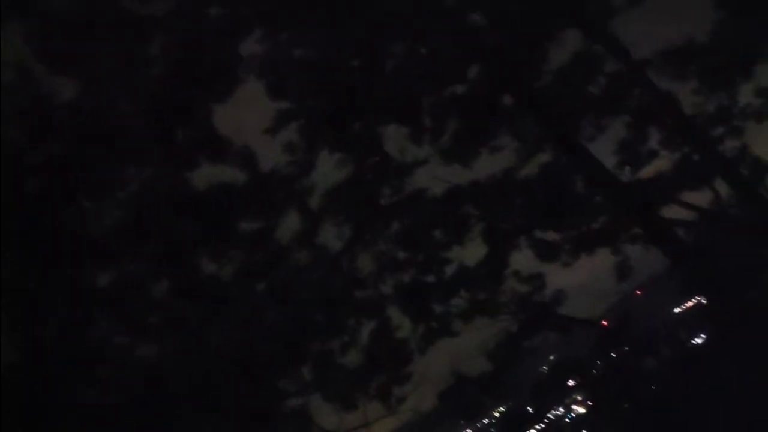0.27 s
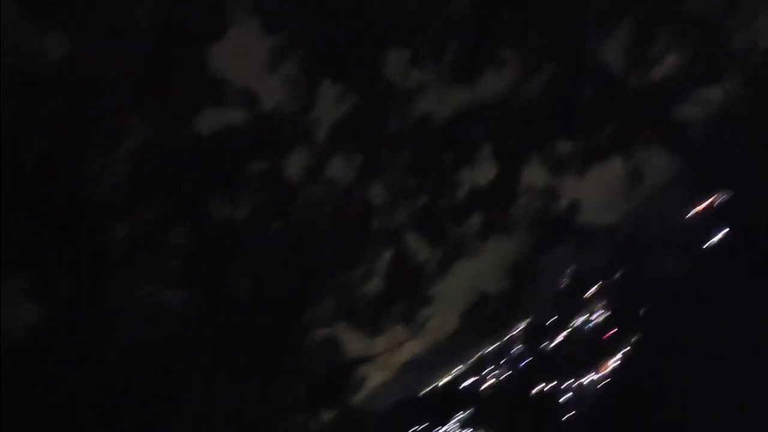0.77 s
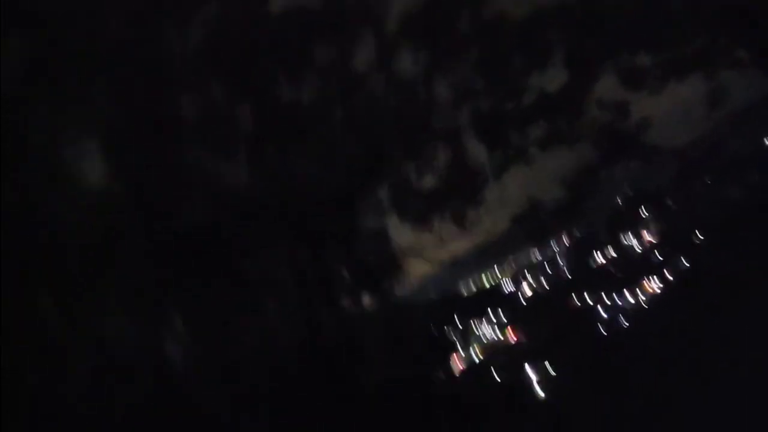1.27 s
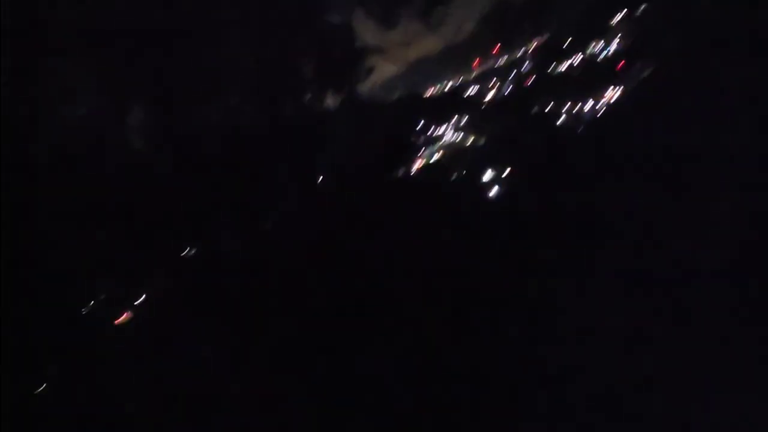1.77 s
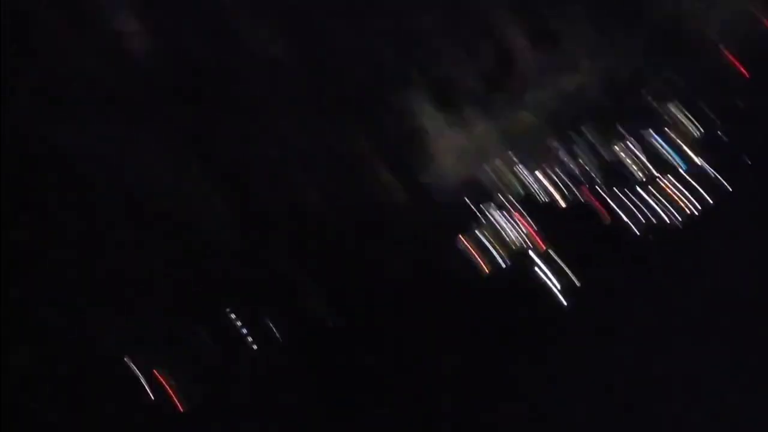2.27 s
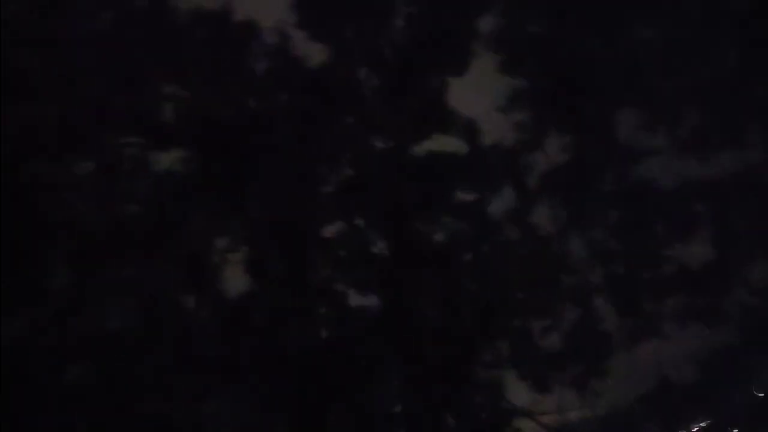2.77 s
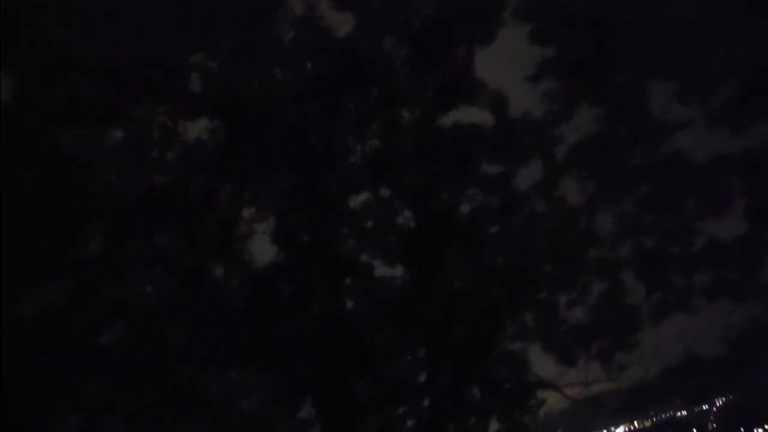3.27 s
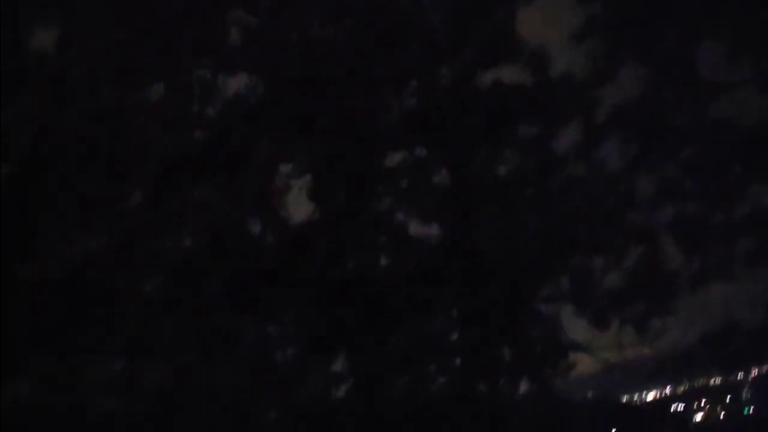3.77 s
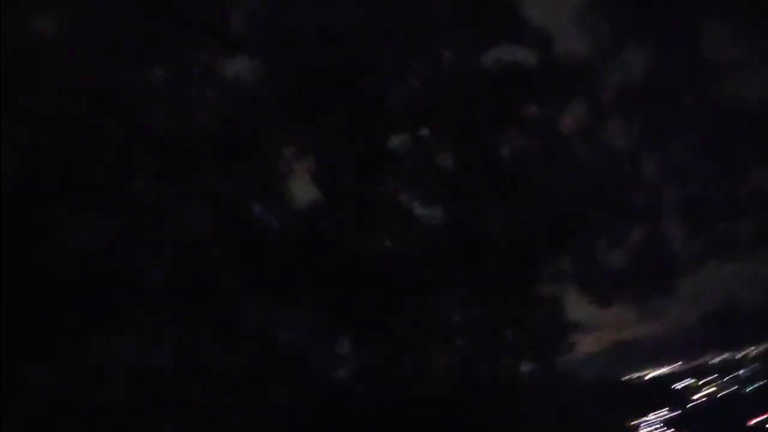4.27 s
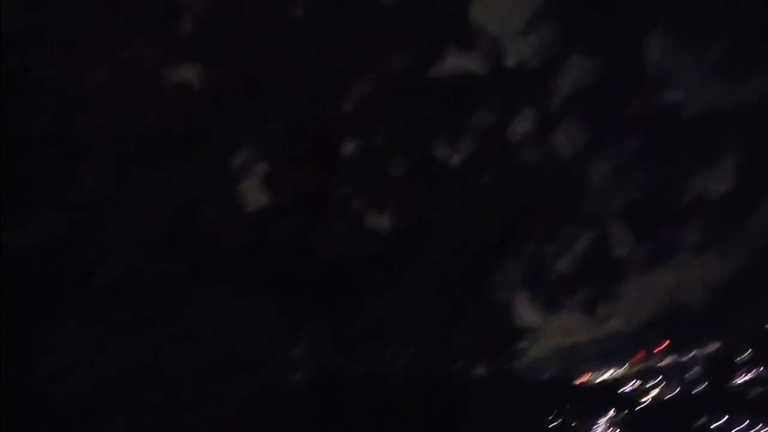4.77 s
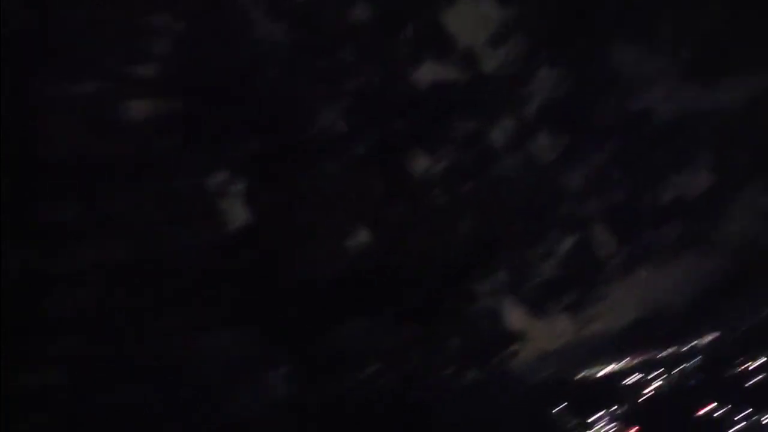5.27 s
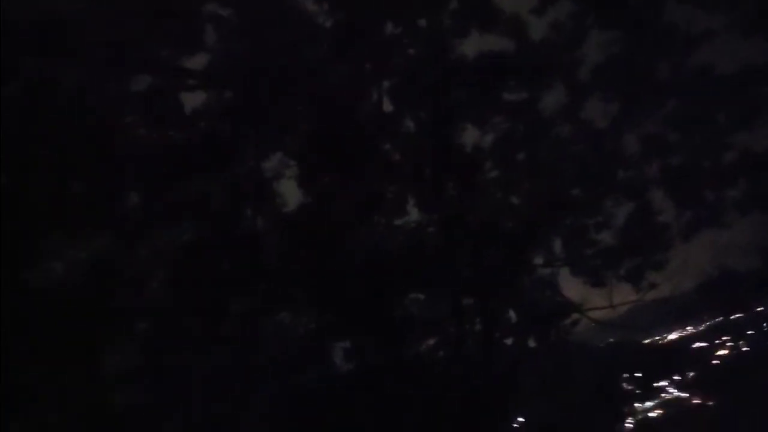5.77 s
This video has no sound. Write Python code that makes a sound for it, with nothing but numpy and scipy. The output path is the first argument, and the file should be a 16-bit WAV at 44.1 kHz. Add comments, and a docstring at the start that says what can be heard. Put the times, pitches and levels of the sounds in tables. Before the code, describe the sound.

Crisp leaf rustle, brittle twig cracks and dull woody thuds from undergrowth on a quiet dark slope, a faint town humming far off.

```python
"""Something treads through dry leaves and brush on a wooded slope, close on the right, for 6 s.
From the start a far town hums (coloured noise) over a deep rumble (band noise), and leaves and litter
stir (resonated and coloured grains). Twigs snap from 0.8 s (rung grain bursts), thuds (rung pushes) join at 1.6 s.
The loudest cracks come near 1.9 s; a second push at 4.3 s brings hard knocks and two stem squeaks
(narrow-band noise); weaker treads and rustling follow."""
import sys
import numpy as np
from scipy import signal
from scipy.fft import rfft, irfft
from scipy.io import wavfile
from scipy.ndimage import uniform_filter1d

SR = 44100
rng = np.random.default_rng(int(sys.argv[2]) if len(sys.argv) > 2 else 0)


def digitize_waveform(pressure):
    """Quantize a signal to 16-bit integers and store it at the path in sys.argv[1].

    Rows of a 2-D input are taken as channels; values are limited to [-1, 1].
    """
    field = np.atleast_2d(pressure).T
    bounded = np.clip(field, -1, 1)
    quanta = np.round(bounded * 32767).astype(np.int16)
    wavfile.write(sys.argv[1], SR, quanta)


N = 265041


def undb(db):
    """dB to gain."""
    return 10 ** (np.asarray(db) / 20)


def unit(x):
    """Scale to rms 1."""
    return x / np.sqrt(np.mean(x ** 2))


def curve(table):
    """Interpolate each table column over time, one value a sample."""
    time_s, *columns = np.transpose(table)
    return [np.interp(np.arange(N) / SR, time_s, column) for column in columns]


def colour(x, points):
    """Shape a spectrum by (Hz, dB) points, linear in log frequency; x has an even length."""
    hz, db = np.transpose(points)
    bin_hz = np.arange(x.shape[-1] // 2 + 1) * SR / x.shape[-1] + 1  # +1 avoids log(0)
    gain_db = np.interp(np.log(bin_hz), np.log(np.maximum(hz, 1)), db)
    return irfft(rfft(x) * undb(gain_db), x.shape[-1])


def walk(rate_hz):
    """Random levels held 1 / rate_hz and slewed; spread near 1."""
    hold = int(SR / rate_hz)
    steps = np.repeat(rng.standard_normal(N // hold + 1), hold)
    return uniform_filter1d(steps, hold // 2)[:N]


def grains(shape, per_s, spread_db):
    """Sparse clicks of either sign; their dB levels spread exponentially, up to 4 spread_db."""
    when, sign = rng.random(shape), rng.standard_normal(shape)
    size = rng.exponential(size=shape)
    return (when < per_s / SR) * np.sign(sign) * undb(spread_db * np.minimum(size, 4))


def ring(x, hz, width_hz):
    """Two-pole resonance, gain 1 at the centre."""
    b, a = signal.iirpeak(hz, hz / min(width_hz, SR / 2.5), SR)
    return signal.lfilter(b, a, x)


def highpass(x, order, hz):
    """Butterworth high-pass."""
    return signal.sosfilt(signal.butter(order, hz, "high", fs=SR, output="sos"), x)


def ports_of(mid, side):
    """Left = mid + side, right = mid - side."""
    return mid + side * np.array([[1], [-1]])


def add(out, x, start_s):
    """Mix an event in at start_s."""
    i = int(start_s * SR)
    out[:, i:i + x.shape[1]] += x[:, :N - i]


# hum and hiss spectrum: (freq_hz, level_db per Hz, relative)
TOWN_SPECTRUM = [(20, -6), (60, -18), (200, -14), (500, -21.5), (1050, -28), (1500, -23), (5000, -15.5),
                 (16000, -37)]
TOWN_RMS_DB = -58.5  # before the slow swell


def town():
    """Far traffic rumble that swells slowly, and the faint hiss of the whole slope, unlike at the two ports."""
    mid, side = rng.standard_normal((2, N + 1))
    side = 0.24 * side + highpass(side, 1, 700)
    noise = colour(ports_of(mid, side), TOWN_SPECTRUM)[:, :N]
    return unit(noise) * undb(TOWN_RMS_DB + 0.92 * walk(0.67))


# rumble level: (time_s, level_db)
RUMBLE_LEVEL = [(0.0, -49.5), (0.38, -62), (0.89, -54.5), (0.97, -70.5), (1.97, -56.5), (3.78, -67.5),
                (4.85, -45), (6.01, -66.5)]


def rumble():
    """Deep, soft 35-80 Hz noise that comes and goes, alike at both ports."""
    band = signal.butter(2, [35, 80], "band", fs=SR, output="sos")
    deep = signal.sosfilt(band, rng.standard_normal(N))
    return unit(deep) * undb(curve(RUMBLE_LEVEL)[0])


# treads and pushes through the brush:
# (peak_s, small_leaves_db, broad_leaves_db, litter_db, rise_s per 20 dB (3 ms at least), decay_t60_s)
STIRS = [(0.134, -42, -54, -58, 0.13, 0.95), (0.359, -44, -49, -56.5, 0.1, 0.45),
         (0.781, -28, -39, -45, -0.03, 0.39), (0.803, -23.5, -31, -32.5, 0.0028, 0.41),
         (0.863, -37.5, -37.5, -32.5, 0.09, 0.29), (1.155, -43, -48.5, -48.5, 0.12, 0.2),
         (1.3, -68, -54, -51.5, 0.24, 1), (1.405, -40.5, -52, -58, 0.05, 0.2),
         (1.501, -35, -42, -56.5, 0.04, 0.14), (1.856, -15.5, -16.5, -39, -0.0022, 0.14),
         (1.946, -26.5, -32.5, -49, 0.08, 0.2), (2.057, -35, -44, -48.5, 0.22, 0.43),
         (2.235, -40, -52, -56, -0.08, 0.69), (2.346, -24.5, -31, -41.5, 0.05, 0.11),
         (2.454, -35.5, -47, -56, 0.14, 0.6), (2.676, -33.5, -45, -44.5, 0.1, 0.11),
         (2.743, -23, -32.5, -46, 0.0225, 0.13), (2.79, -34.5, -43, -48.5, 0.11, 0.72),
         (2.968, -37.5, -64, -75, -0.5, 0.22), (3.078, -41, -54.5, -73, -1.2, 0.53),
         (3.359, -35.5, -59, -53, -0.05, 0.14), (3.51, -40, -47.5, -67, 0.1, 0.2),
         (3.642, -46.5, -64, -66, 0.06, 0.59), (3.85, -45, -50.5, -58.5, 0.4, 0.72),
         (4.036, -34.5, -41.5, -42.5, .05, 0.45), (4.316, -35, -24, -35.5, 0.0068, 0.24),
         (4.36, -25, -31.5, -30.5, 0.0878, 0.21), (4.54, -33, -36.5, -43, .3, 0.15),
         (4.689, -30, -37.5, -44.5, -0.08, 1), (4.864, -32.5, -48.5, -45, 0.13, 0.32),
         (5.218, -39.5, -42, -46.5, 0.23, 0.73), (5.497, -33.5, -38, -46.5, 0.12, 0.33),
         (5.632, -34, -47, -49.5, 0.17, 0.23), (5.761, -35, -45.5, -54, 0.04, 0.5),
         (5.967, -35, -43, -44.5, 0.02, 0.31)]
# leaves and litter settling between the stirs: (time_s, small_leaves_db, broad_leaves_db, litter_db)
SETTLING = [(0, -46.5, -54.5, -56.5), (.45, -65, -63.5, -68), (.65, -67, -61, -57.5),
            (1.1, -52.5, -56.5, -86), (1.7, -54.5, -60.5, -79), (2.2, -46.5, -54, -56.5),
            (2.6, -41, -49, -56.5), (3.3, -49.5, -56, -59), (4.0, -57.5, -66.5, -68),
            (4.23, -68, -49, -45.5), (4.45, -33, -42.5, -45), (5.0, -42.5, -50, -52), (5.4, -48, -62, -62),
            (6.0, -56, -60.5, -66)]


def movement():
    """Gains of small leaves, broad leaves and litter: every stir swells and dies away; powers add."""
    t = np.arange(N) / SR
    power = undb(curve(SETTLING)) ** 2
    for peak_s, small_db, broad_db, litter_db, rise_s, t60_s in STIRS:
        rise_db = 20 * (t - peak_s) / max(rise_s, 0.003)
        decay_db = -60 * (t - peak_s) / t60_s
        shape_db = np.where(t < peak_s, rise_db, decay_db)
        power = power + undb([[small_db], [broad_db], [litter_db]] + shape_db) ** 2
    return np.sqrt(power)


def jolts(per_s, fade_s, depth):
    """A steady push with sudden slips that die away fast."""
    fade = np.exp(-np.arange(2048) / SR / fade_s)
    slips = np.convolve(abs(grains(N, per_s, spread_db=4.5)), fade)[:N]
    return 1 + depth * slips


# delays of the left port behind the right: (lag_samples, ...)
LEFT_LAGS = (10, 13, 15, 20)


def patches(table, stir):
    """Leaf patches in different directions; each click shivers a leaf for a few ms, partly unlike at the ports."""
    out, fade = 0, np.exp(-np.arange(512) / SR / 0.0048)
    for shiver_hz, width_hz, level_db in table:
        clicks = grains(N, per_s=900, spread_db=-1.0) * stir * undb(2.24 * walk(25))
        noise = rng.standard_normal(N) + rng.standard_normal((2, N))  # shared + own to each port
        shiver = np.convolve(abs(clicks), fade)[:N] * noise
        rung = ring(4 * clicks + shiver, shiver_hz, width_hz)
        left, right = ring(rung, shiver_hz, 2 * width_hz)
        left = np.roll(left, rng.choice(LEFT_LAGS))
        out = out + undb(level_db) * unit(np.array([left, right]))
    return unit(out)


# patches of small leaves: (shiver_hz, width_hz, level_db relative)
SMALL_LEAVES = [(4620, 1170, -5), (6300, 4000, 2.5), (9500, 11000, 0), (11370, 6100, 2.5),
                (16400, 8100, -8.5)]
# patches of broad leaves: (shiver_hz, width_hz, level_db relative)
BROAD_LEAVES = [(1441, 470, -0.5), (2170, 860, -4), (3200, 1000, 0.5)]


def leaves(small_gain, broad_gain):
    """Small leaves hiss, broad ones crackle lower; the same jolts stir both."""
    stir = jolts(per_s=60, fade_s=0.0031, depth=0.61)
    ticks = grains((2, N), per_s=60, spread_db=3.5)  # lone brittle leaves breaking
    left = sum(np.roll(x, lag) for x, lag in zip(ticks, LEFT_LAGS))
    right = ticks.sum(0)
    ticks = ring(np.array([left, right]), 6000, 8000)
    small = patches(SMALL_LEAVES, stir) + 0.31 * unit(ticks)
    broad = patches(BROAD_LEAVES, stir)
    return small_gain * small + broad_gain * broad


# litter spectrum: (freq_hz, level_db per Hz, relative)
LITTER_SPECTRUM = [(30, -28), (80, -4), (150, -3.5), (350, -4.5), (600, -8), (1000, -18), (1600, -75)]


def litter(gain):
    """Dense, dull grains of the compacting layer that gives way in short bumps, nearly alike at both ports."""
    mid, side = grains((2, N + 1), per_s=2500, spread_db=3.0)
    body = colour(ports_of(mid, 0.37 * side), LITTER_SPECTRUM)[:, :N]
    return unit(body * jolts(per_s=25, fade_s=0.0094, depth=0.6)) * gain


# twigs and stiff leaves breaking:
# (start_s, ring_peak_db, ring_hz, treble_db relative to the ring, fibre_decay_t60_s)
SNAPS = [(0.7724, -17, 4960, 8, 0.034), (1.3287, -30, 2380, 12, 0.083), (1.375, -25.5, 4940, 6.5, 0.029),
         (1.442, -25.5, 5860, 7, 0.017), (1.502, -22.5, 4200, 5, 0.027), (1.8546, 1, 2150, 4, 0.017),
         (1.8662, 1, 1860, -16, 0.068), (1.933, 4, 1550, -33, 0.032), (1.954, 0.5, 1900, -38, 0.042),
         (2.001, -8.5, 1520, 1, 0.074), (2.106, -24, 9100, 0, 0.008), (2.1209, -1, 3520, -20, 0.024),
         (2.15, -22.5, 5500, -8, 0.021), (2.2001, -9.5, 5050, -19, 0.031), (2.226, -18, 6000, -7, 0.008),
         (2.2345, -18, 4840, 8.5, 0.07), (2.2856, -16, 4540, 3, 0.017), (2.3253, -9.5, 4100, -12, 0.016),
         (2.3409, -8.5, 2320, 5.5, 0.017), (2.3521, -9.5, 2300, -11, 0.02), (2.402, -5.5, 4020, -22, 0.027),
         (2.624, -16, 4150, -3, 0.011), (2.725, -17, 4550, -20, 0.027), (2.768, -9.5, 4040, -15, 0.015),
         (3.0694, -19.5, 6900, 8, 0.03), (3.292, -22, 3500, 0.5, 0.042), (3.3544, -22, 3650, 11.5, 0.016),
         (3.635, -20, 3680, 4, 0.062), (4.0132, -24, 2970, 7, 0.13), (4.3131, -6.5, 1310, -13, 0.077),
         (4.3228, -0.5, 6750, -16, 0.012), (4.356, -13, 5750, -13, 0.031), (4.4524, -11, 1270, -6, 0.01),
         (4.586, -6, 3460, -27, 0.025), (4.6775, -1.5, 1670, -23, 0.035), (4.739, -15.5, 1270, -4, 0.028),
         (4.8138, -9, 2340, -13, 0.044), (5.1534, -19, 2800, -2, 0.066), (5.206, -15, 2420, -8, 0.014),
         (5.24, -17, 1790, -11, 0.012), (5.273, -18.5, 1790, -11, 0.0091), (5.422, -11, 1400, -18, 0.026),
         (5.4985, -17, 2500, -4, 0.014), (5.9625, -18.5, 4990, 1, 0.013)]
CRACK_SAMPLE = 60  # after the onset


def snaps():
    """A break: fibres creak, one sharp crack, then a dying rattle that rings the twig."""
    out, t = np.zeros((2, N)), np.arange(4096) / SR
    for start_s, peak_db, ring_hz, treble_db, t60_s in SNAPS:
        shared = grains(4096, per_s=5200, spread_db=2.5)
        fibres = shared + 0.5 * grains((2, 4096), per_s=7000, spread_db=6.5)
        fibres *= (1 - np.exp(-t / 0.00052)) * undb(-60 * t / t60_s)
        fibres[:, CRACK_SAMPLE] += 6.0
        twig = ring(fibres, ring_hz, 0.22 * ring_hz)
        twig = twig + 0.39 * ring(fibres, 1.03 * ring_hz, 2.5 * ring_hz)
        hiss = highpass(fibres, 2, 6500)
        x = twig / abs(twig).max() + undb(treble_db) * hiss / abs(hiss).max()
        x[0] = np.roll(x[0], rng.choice(LEFT_LAGS[1:]))
        add(out, x * undb(peak_db), start_s)
    return out


# hollow knocks on roots and ground: (start_s, peak_db, ring_hz)
THUDS = [(1.611, -40.5, 300), (1.642, -34.5, 110), (1.853, -20.5, 560), (1.87, -28, 107), (1.93, -25, 520),
         (1.951, -32, 87), (2.082, -31.5, 690), (2.334, -31.5, 410), (2.402, -35.5, 128), (2.656, -38, 221),
         (2.675, -33, 500), (2.684, -31, 104), (2.736, -29.5, 590), (2.84, -32, 554), (3.935, -39, 337),
         (4.036, -25.5, 426), (4.094, -29.5, 300), (4.194, -32.5, 260), (4.316, -14.5, 680),
         (4.279, -17.5, 1220), (4.304, -14.5, 1390), (4.345, -21, 297), (4.674, -39, 330),
         (4.825, -20.5, 340), (4.886, -21, 486), (4.901, -13, 384), (5.016, -24.5, 308),
         (5.156, -32.5, 367)]
GRIT_T60_CYCLES = 18.8  # cycles of ring_hz


def thuds():
    """A soft, gritty push rings a hollow root or the packed soil for a few cycles."""
    out, t = np.zeros((2, N)), np.arange(8192) / SR
    for start_s, peak_db, ring_hz in THUDS:
        cycles = t * ring_hz
        noise = rng.standard_normal(8192) + 0.06 * rng.standard_normal((2, 8192))
        grit = ring(noise, ring_hz, 1.8 * ring_hz) * undb(-60 * cycles / GRIT_T60_CYCLES)
        push = cycles * np.exp(-cycles / 0.12) + 0.095 * grit
        x = ring(push, ring_hz, 0.22 * ring_hz) + 0.5 * ring(push, 2.1 * ring_hz, 2.6 * ring_hz)
        x[0] = np.roll(x[0], rng.choice(LEFT_LAGS))
        add(out, x / abs(x).max() * undb(peak_db), start_s)
    return out


# a taut stem squeaks as it is rubbed: (start_s, peak_db, length_s)
SQUEAKS = [(4.348, -20.5, 0.032), (4.732, -22.5, 0.038)]
STEM_HZ, STEM_WIDTH_HZ = 5960, 120


def squeaks():
    """Rubbing noise through one narrow resonance of the stem."""
    out, t = np.zeros((2, N)), np.arange(4096) / SR
    for start_s, peak_db, length_s in SQUEAKS:
        rub = rng.standard_normal((2, 4096)) * t * np.exp(-4 * t / length_s)
        x = ring(rub, STEM_HZ, STEM_WIDTH_HZ)
        add(out, x / abs(x).max() * undb(peak_db), start_s)
    return out


def scene():
    """All sources at the two ports."""
    small_gain, broad_gain, litter_gain = movement()
    background = town() + rumble()
    ground = leaves(small_gain, broad_gain) + litter(litter_gain)
    return background + ground + snaps() + thuds() + squeaks()


# port colour: (freq_hz, left_minus_right_db)
PORT_COLOUR = [(60, 3.5), (400, 5.5), (2000, 2), (8000, -4.5), (14000, -5)]
TOP_HZ = 15750


def record(dry):
    """The loudest cracks are rounded, the two ports differ in colour; the top is cut."""
    rounded = np.pad(np.tanh(dry), ((0, 0), (0, 1)))  # even length for colour()
    ports = []
    for x, sign in zip(rounded, (1, -1)):
        ports.append(colour(x, [(hz, sign * db / 2) for hz, db in PORT_COLOUR]))
    lowpass = signal.ellip(10, 0.2, 70, TOP_HZ, fs=SR, output="sos")
    return signal.sosfilt(lowpass, np.array(ports)[:, :N])


dry = scene()
out = record(dry)
digitize_waveform(out)
```